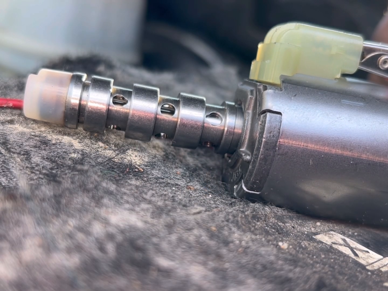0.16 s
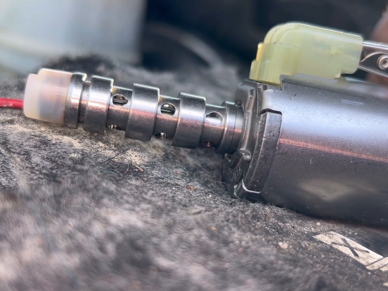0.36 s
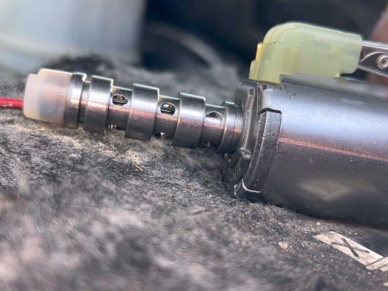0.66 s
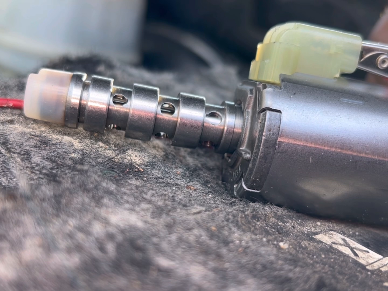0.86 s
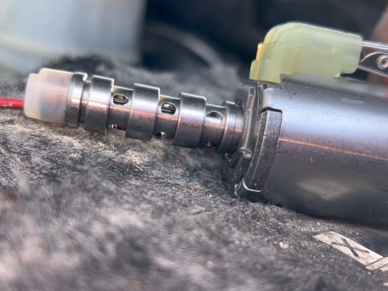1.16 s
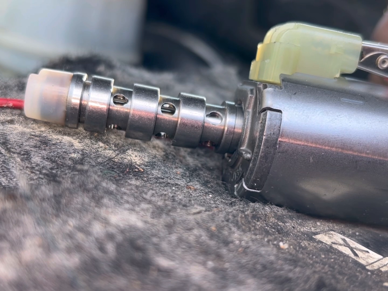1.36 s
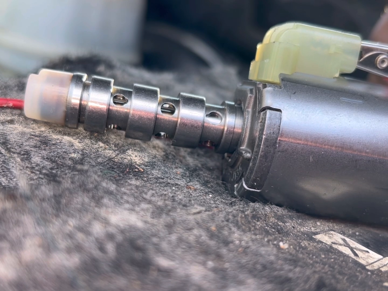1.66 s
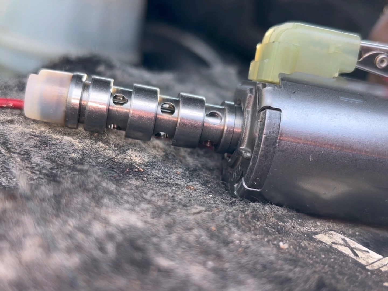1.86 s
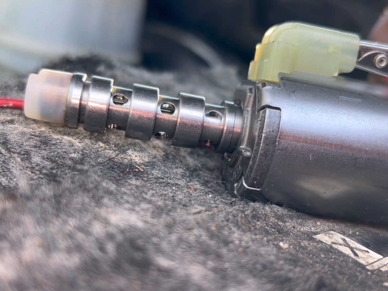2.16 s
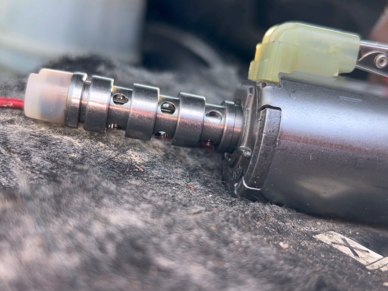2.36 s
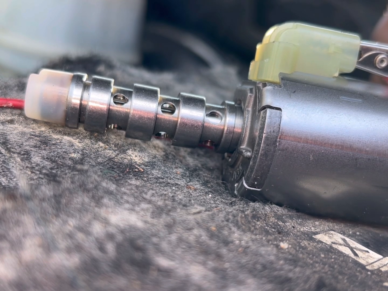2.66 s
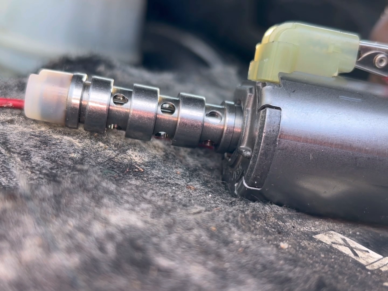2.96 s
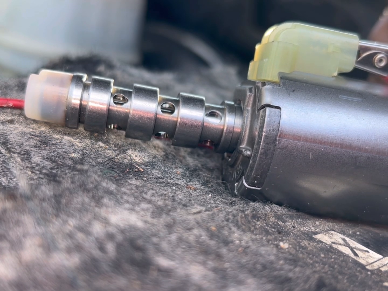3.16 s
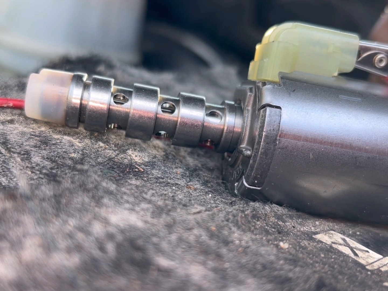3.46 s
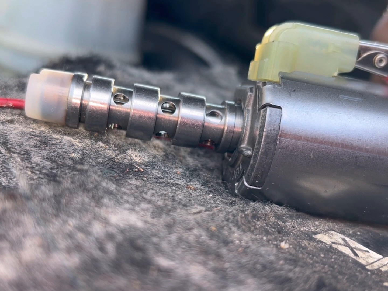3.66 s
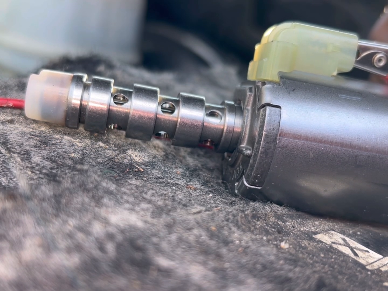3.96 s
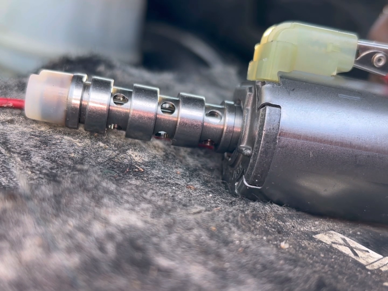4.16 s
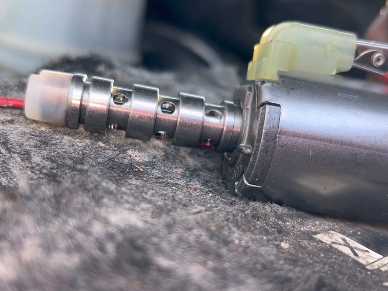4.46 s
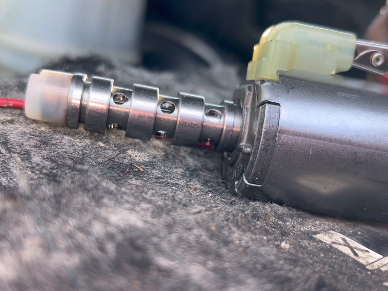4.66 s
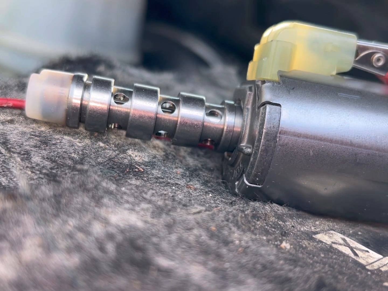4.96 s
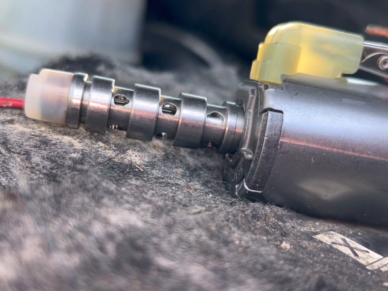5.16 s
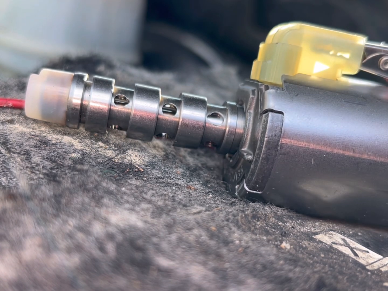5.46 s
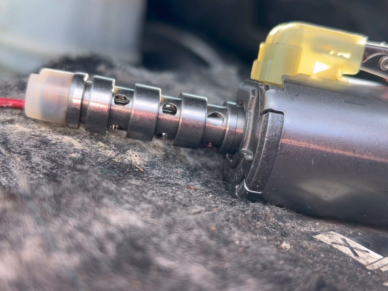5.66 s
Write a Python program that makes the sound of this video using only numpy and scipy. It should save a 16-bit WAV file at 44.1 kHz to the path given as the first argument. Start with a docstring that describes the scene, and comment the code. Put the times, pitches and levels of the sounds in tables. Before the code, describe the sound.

Close, sharp steel clicks and thumping clacks from a powered valve, unevenly spaced, with brief ringing, small wire ticks and faint low hum.

```python
"""A transmission solenoid on a cloth-covered workshop bench, tapped with power close to a phone's microphones.
Its spool scrapes in to a bright click and springs back with a squeal and a clack: shaped noise bursts.
Each stop rings paired steel modes; filtered pushes make the body thump, rock and hop on the bench.
Wire ticks, squeaks and rustles are small noise bursts; a low hum, room air and a faint hiss lie behind."""
import sys
import numpy as np
from scipy import signal
from scipy.fft import rfft, irfft
from scipy.io import wavfile
from scipy.ndimage import uniform_filter1d, minimum_filter1d

SR = 44100
rng = np.random.default_rng(int(sys.argv[2]) if len(sys.argv) > 2 else 0)


def wav_record(signal):
    """Record a signal, one row per channel, as 16-bit PCM in the file named by sys.argv[1]."""
    frames = np.transpose(np.atleast_2d(signal))
    bounded = np.clip(frames, -1, 1)
    # unit amplitude maps onto the largest positive 16-bit level
    quanta = np.round(bounded * 32767).astype(np.int16)
    wavfile.write(sys.argv[1], SR, quanta)


N = 257103  # length of the scene [samples]
SIZE = 32768  # length of one blow, and of the room's answer [samples]
T = np.arange(SIZE) / SR - 2048 / SR  # time around a blow [s]


def undb(db):
    """Decibels to amplitude gain."""
    return 10 ** (np.asarray(db) / 20)


def unit(x):
    """Scale to rms 1."""
    return x / np.sqrt(np.mean(x ** 2))


def freqs(x):
    """Frequency of each spectral bin of x [Hz], kept above zero."""
    return np.maximum(np.fft.rfftfreq(x.shape[-1], 1 / SR), 1e-3)


def filtered(x, response):
    """Apply a frequency response."""
    return irfft(rfft(x) * response, x.shape[-1])


def point_gain(x, points):
    """Gain at each bin of x, drawn through (frequency [Hz], level [dB]) points on a log frequency axis."""
    hz, db = np.transpose(points)
    return undb(np.interp(np.log(freqs(x)), np.log(hz), db))


def colour(x, points):
    """Shape the spectrum of x without shifting its phase."""
    return filtered(x, point_gain(x, points))


def struck(x, points):
    """Shape x like a struck body, which rings only after the blow (minimum phase)."""
    cepstrum = irfft(np.log(point_gain(x, points)))
    # doubling positive times and dropping negative ones leaves only a causal response
    causal = cepstrum * (1 + np.sign(np.fft.fftfreq(len(x))))
    return filtered(x, np.exp(rfft(causal)))


def resonance(x, hz, width_hz):
    """One damped resonance, gain 1 at its centre."""
    f = freqs(x)
    return filtered(x, 1 / (1 + 1j * (f ** 2 - hz ** 2) / (f * width_hz)))


def fade(t, t60):
    """Exponential decay that starts at t = 0 and falls 60 dB in t60 seconds."""
    return (t >= 0) * np.exp(-np.log(1000) * np.abs(t) / t60)


def waver(rate):
    """Slow random swell of rms 1, mostly below the given rate [Hz]."""
    return unit(colour(rng.standard_normal(N), [(rate, 0), (2 * rate, -20), (4 * rate, -80)]))


def stereo_noise(points):
    """Diffuse noise of rms 1: alike at both ports in the bass, unrelated in the treble."""
    mid, side = rng.standard_normal((2, N))
    side = colour(side, [(60, -25.5), (150, -13), (400, 1.0), (1000, 0.0), (16000, 2.5)])
    left_right = mid + side * np.array([[1], [-1]])
    return unit(colour(left_right, points))


def add(track, s, sound):
    """Mix a blow into the track at time s."""
    start = int(round((s + T[0]) * SR))
    track[start:start + SIZE] += sound[:N - start]


def chatter(envelope):
    """Countless tiny contacts under an envelope: noise of unit energy."""
    x = rng.standard_normal(SIZE) * envelope
    return x / np.sqrt(np.sum(x ** 2))


# workshop hum before levelling: (frequency [Hz], level [dB])
HUM_COLOUR = [(20, -28.5), (40, -6.5), (65, 14.5), (85, 12), (120, 10), (155, 7), (190, -15), (300, -64)]
# room air before levelling: (frequency [Hz], level [dB])
AIR_COLOUR = [(120, -15), (180, -0.5), (316, -11.5), (480, -12), (700, -18.5), (950, -20), (1650, -28.5),
              (2400, -40.5), (5700, -49), (7300, -44), (8700, -39), (9700, -48.5), (14300, -44),
              (15600, -67)]
HUM_DB, HUM_DROP_DB = -42, -8.5
HUM_DROP_AT_S, HUM_DROP_TAKES_S = 1.91, 0.04


def workshop():
    """Low wavering machine hum that drops once, a faint tone, room air and a thin high hiss."""
    t = np.arange(N) / SR
    dropped = np.clip((t - HUM_DROP_AT_S) / HUM_DROP_TAKES_S, 0, 1)
    hum = stereo_noise(HUM_COLOUR) * undb(HUM_DB + HUM_DROP_DB * dropped + 0.79 * waver(3))
    tone = undb(-73.0 + 2 * waver(6.1)) * np.sin(2 * np.pi * 506 * t)
    air = stereo_noise(AIR_COLOUR) * undb(-58 + .5 * waver(3.3))
    hiss_colour = [(8000, -38), (10100, -34), (10500, 8.0), (10850, 11), (11200, -34.5), (12500, -47)]
    hiss = stereo_noise(hiss_colour) * undb(-76)
    return hum + tone + air + hiss


# faint squeaks of the wire, close to the microphones: (time [s], level [dB])
SQUEAKS = [(.3, -79), (4.983, -71), (5.283, -76), (5.579, -76.5)]


def squeaks():
    """Brief narrow bursts where the wire rubs: noise through two equal resonances."""
    track = np.zeros(N)
    for s, db in SQUEAKS:
        rub = resonance(rng.standard_normal(SIZE), 2600, 260)
        rub = unit(resonance(rub, 2600, 260))
        add(track, s, undb(db) * rub * np.exp(-(T / 0.022) ** 2))
    return track


# scrape of the spool along its bore: (frequency [Hz], level [dB])
SLIDE_COLOUR = [(200, -4.5), (1700, 8), (3000, -3), (5500, 3), (6800, 2), (7600, 15), (8800, -39.5),
                (11000, 2.5), (14500, -13.5), (16000, -28)]


def slide(gain_db, build_t60):
    """The spool scrapes along its bore in uneven grains, louder and louder up to the stop."""
    grains = undb(5.8 * rng.standard_normal(SIZE))
    scrape = chatter(grains * fade(-T, build_t60))
    return undb(gain_db) * colour(scrape, SLIDE_COLOUR)


def crack(length_s):
    """Steel meets steel: a brief rough contact with an even spectrum and unit energy."""
    window = np.exp(-((T - length_s) / length_s) ** 2)
    x = rng.standard_normal(SIZE)
    # alternate between brief in time and even in spectrum
    for _ in range(4):
        x = irfft(np.exp(1j * np.angle(rfft(x * window))))
    return x


def click(points, gain_db, contact_s, settle_db, settle_t60, rebound_s, rebound_db, rebound_t60):
    """The spool hits its stop, chatters against it and rebounds once."""
    settle = undb(settle_db) * chatter(fade(T - contact_s, settle_t60))
    rebound = undb(rebound_db) * chatter(fade(T - rebound_s, rebound_t60))
    return undb(gain_db) * struck(crack(contact_s) + settle + rebound, points)


def ring(modes, t, split_hz=9):
    """Steel modes in close pairs that beat and fade along t; each blow shares energy among them anew."""
    out = 0
    for hz, db, t60 in modes:
        main = np.sin(2 * np.pi * (hz * t + rng.random()))
        twin = np.sin(2 * np.pi * ((hz + split_hz) * t + rng.random()))
        gain = undb(db + 0.46 * rng.standard_normal())
        out = out + gain * fade(t, t60) * (main + 0.3 * twin)
    return out


def rattle(gain_db, spread_db=7):
    """Loose parts shake: small contacts of uneven size that die away."""
    sizes = undb(spread_db * rng.standard_normal(SIZE))
    contacts = chatter(sizes * fade(T, .12))
    points = [(500, 1.5), (1500, 5), (3500, 1.5), (6000, 0.5), (8000, 5), (10000, -5.5), (15000, -8.5)]
    return undb(gain_db) * colour(contacts, points)


# spool pulls in; click and slide get a shared boost below:
# (time [s], click level [dB], slide level [dB], slide build-up t60 [s], ring level [dB])
PULLS = [(0.8904, 5.5, -25, .018, 2), (2.111, 0, -25.5, 0.015, 4), (3.129, 0.5, -28, 0.021, -1),
         (4.6846, 3, -25.5, .045, 2.5)]
# steel with the spool pulled in: (frequency [Hz], level [dB], t60 [s])
PULLED_MODES = [(1707, -62, .28), (4452, -64, .38), (5066, -60, .19), (5346, -62, .17), (6153, -57, .21),
                (6751, -57, .13), (7580, -48, .11), (11970, -68, .15)]
# the click of the pull: (frequency [Hz], level [dB])
PULL_COLOUR = [(60, -39), (300, -25), (1500, -36.5), (3000, -13), (4400, -23), (6500, -14), (7450, 4.5),
               (8600, -3.5), (9600, 9), (10800, -3.5), (11500, -9), (13600, -4.5), (14600, 10), (16300, -8)]
PULL_RATTLE_DB = -30  # against the click level in the table


def pulls():
    """The coil snaps the spool in: a light scrape, a bright click, ringing steel."""
    track = np.zeros(N)
    for s, db, slide_db, slide_t60, ring_db in PULLS:
        scrape = slide(slide_db, slide_t60)
        stop = click(PULL_COLOUR, db, contact_s=0.00011, settle_db=-8.0, settle_t60=0.017,
                     rebound_s=0.0059, rebound_db=-19.0, rebound_t60=0.0048)
        steel = undb(ring_db) * ring(PULLED_MODES, T)
        loose = rattle(db + PULL_RATTLE_DB)
        add(track, s, undb(8.0) * (scrape + stop) + steel + loose)
    return track


# the body hops and lands hard, then once more softly:
# (time of landing [s], level [dB], time to the second landing [s])
HOPS = [(2.5231, 12.5, .0588), (3.5902, 13.5, .0423), (4.8698, 7.5, .0632)]
# a pull nudges the body and lets it rock back; levels against its click in the table
NUDGE_DB, NUDGE_RECOIL_DB = -6, -3.5
NUDGE_ROCK_S, NUDGE_ROCK_DB = 0.014, -7
# the body rocks back after each thump: delay, level against the thump, level against the recoil
ROCK_S, ROCK_DB, ROCK_RECOIL_DB = .031, -10.5, -24
# levels against the first landing
LANDING_RECOIL_DB, SECOND_LANDING_DB, SECOND_RECOIL_DB = 0, -5.5, -7.5
LANDING_HZ, CLOTH_HZ = 6010, 450  # bandwidth of a hard landing and of a soft one


def bench_blows():
    """Strokes push the body and rock it back; hops land twice: (time [s], level [dB], Hz, recoil [dB])."""
    for s, db, *_ in PULLS:
        yield s, db + NUDGE_DB, CLOTH_HZ, db + NUDGE_RECOIL_DB
        yield s + NUDGE_ROCK_S, db + NUDGE_ROCK_DB, CLOTH_HZ, db + NUDGE_ROCK_DB
    for s, *_, thump_db, thump_hz, recoil_db in RELEASES:
        yield s, thump_db, thump_hz, recoil_db
        yield s + ROCK_S, thump_db + ROCK_DB, CLOTH_HZ, recoil_db + ROCK_RECOIL_DB
    for s, db, flight_s in HOPS:
        yield s, db, LANDING_HZ, db + LANDING_RECOIL_DB
        yield s + flight_s, db + SECOND_LANDING_DB, CLOTH_HZ, db + SECOND_RECOIL_DB


# short resonances of the bench under the body: (frequency [Hz], width [Hz], level [dB])
BENCH_MODES = [(257, 25, -9), (395, 26, -6), (615, 16, -9.5), (912, 60, -13.5)]
# body knocking on the bench: (frequency [Hz], level [dB])
KNOCK_COLOUR = [(25, -4.5), (80, 0), (180, 3.5), (400, -2), (600, -6), (950, -15.5), (1600, -19.5),
                (2500, -19), (4200, -25.5), (7000, -27), (16000, -26)]
# body recoiling into the cloth: (frequency [Hz], level [dB])
RECOIL_COLOUR = [(15, -22), (30, -7.5), (58, 1.5), (80, -3), (110, -6), (160, -24.5), (300, -43),
                 (600, -64.5)]


def knocks():
    """Body recoils into the cloth and hops; hard landings ring the coil can, the bench top booms on."""
    track, recoil = np.zeros(N), np.zeros(N)
    push = 1. * (np.abs(T) < .5 / SR)  # a single sample
    for s, db, contact_hz, recoil_db in bench_blows():
        # a softer contact dulls the blow
        blow = filtered(push, 1 / np.sqrt(1 + (freqs(push) / contact_hz) ** 6))
        add(track, s, undb(db) * blow)
        add(recoil, s, undb(recoil_db) * push)
    can = undb(-18.5) * resonance(track, 6304, 4.5)
    top = undb(0.5) * resonance(recoil, 50, 3)
    bench = sum(undb(db) * resonance(track, hz, width_hz) for hz, width_hz, db in BENCH_MODES)
    return colour(track, KNOCK_COLOUR) + bench + colour(recoil, RECOIL_COLOUR) + can + top


# spool springs back; click and squeal get a shared boost below:
# (time [s], click level [dB], squeal level [dB], ring level [dB], thump level on the bench [dB],
#  thump bandwidth [Hz], recoil level into the cloth [dB])
RELEASES = [(1.152, 4, -28, 5, 15, 2385, 42.5), (2.4792, -1.5, -20.5, -2, 18.5, 4400, 37),
            (3.5411, 3, -6, -1.5, 17, 6740, 34), (4.5, 3.5, -19, -0.5, -1, 1080, 17),
            (4.8263, 2.5, -25, 1.5, 11.5, 4500, 29)]
# steel with the spool at rest: (frequency [Hz], level [dB], t60 [s])
REST_MODES = [(1640, -50, .08), (5308, -62, .16), (7565, -50, .38), (7957, -43, .08), (8145, -57, .18),
              (8942, -50, .2), (9345, -52, .1)]
# steel while the spool slides back: (frequency [Hz], level [dB], build-up t60 [s])
SLIDING_MODES = [(1717, -46, .07), (3600, -47, .06), (5378, -48, .06), (6525, -32, .055)]
# the clack of the release: (frequency [Hz], level [dB])
RELEASE_COLOUR = [(200, -1.5), (1500, -20.5), (4200, -13), (5100, -18.5), (6500, -7), (7400, 2.5),
                  (8600, -2), (9600, 5.5), (10900, -13), (12000, -2.5), (13400, 1.5), (14900, 8),
                  (15500, -24), (16500, -38.5)]
# a faster return thumps and scrapes harder: slide level at a 0 dB thump, dB of slide per dB of thump
RETURN_SLIDE_DB, SLIDE_PER_THUMP = -17.5, 0.44
TRAVEL_S = 0.015  # the spool squeals only while it moves
RATTLE_DB = -37  # against the thump level in the table


def releases():
    """The spring drives the spool back: scrape and thin squeal swell to the clack, then steel rings."""
    track = np.zeros(N)
    for s, db, squeal_db, ring_db, thump_db, _, _ in RELEASES:
        scrape = slide(RETURN_SLIDE_DB + SLIDE_PER_THUMP * thump_db, build_t60=.021)
        # modes along reversed time grow up to the stop
        moving = np.exp(-(T / TRAVEL_S) ** 4)
        squeal = undb(squeal_db) * ring(SLIDING_MODES, -T) * moving
        stop = click(RELEASE_COLOUR, db, contact_s=.0003, settle_db=-11.5, settle_t60=0.01,
                     rebound_s=0.0037, rebound_db=-10.5, rebound_t60=0.0082)
        steel = undb(ring_db) * ring(REST_MODES, T)
        loose = rattle(thump_db + RATTLE_DB)
        add(track, s, undb(9.0) * (scrape + squeal + stop) + steel + loose)
    return track


# soft rustles of handling: (time [s], half length [s], level [dB])
RUSTLES = [(2.661, 0.16, -68), (5.16, 0.17, -68.5), (5.631, 0.12, -66), (5.77, 0.069, -65)]


def rustles():
    """Short uneven swells of rubbing: diffuse noise under smooth humps."""
    t = np.arange(N) / SR
    swell = sum(undb(db) * np.exp(-((t - s) / length_s) ** 2) for s, length_s, db in RUSTLES)
    rub = stereo_noise([(150, -6), (600, 2), (1800, -3), (4000, -12.0), (6000, -21.5), (15000, -28.0)])
    return rub * swell * undb(1.5 * waver(20))


# the wire ticks on its terminal, before colouring: (time [s], level [dB])
TICKS = [(4.9443, -17.5), (4.9827, -26), (4.998, -25), (5.074, -23.5)]
TICK_BOUNCE_S, TICK_BOUNCE_DB = 0.0049, -9  # delay, level against the tick


def ticks():
    """Tiny bright contacts of the wire, each with one weaker bounce."""
    track = np.zeros(N)
    for s, db in TICKS:
        for delay_s, drop_db in [(0, 0), (TICK_BOUNCE_S, TICK_BOUNCE_DB)]:
            add(track, s + delay_s, undb(db + drop_db) * chatter(fade(T, 0.011)))
    return colour(track, [(500, -6.0), (2500, -14.0), (5000, -16.5), (8000, -2.5), (12000, -1.5), (16000, -22)])


# the phone body shades and delays sound between its microphone ports:
# (frequency [Hz], left leads [rad], left minus right [dB])
PORTS = [(60, 0.2, -0.3), (250, 0.3, -1), (600, 0.37, 0.5), (1080, -0.74, 7), (2340, 0.86, 1.5),
         (3800, 0.77, 5), (5130, 1, 0), (7530, -0.7, 1), (8390, -1.5, -1), (10880, -4.5, -0.5),
         (14400, -8.5, -2.5)]


def ports(x):
    """What each microphone port picks up from a source close by."""
    hz, rad, db = np.transpose(PORTS)
    lead = np.interp(freqs(x), hz, rad)
    tilt = undb(np.interp(freqs(x), hz, db) / 2)  # half the difference to each side
    return np.array([filtered(x, tilt * np.exp(1j * lead)), filtered(x, 1 / tilt)])


# the workshop's answer: (frequency [Hz], level [dB])
ROOM_COLOUR = [(60, -14), (300, -8), (1500, 7.5), (4000, 2.5), (6000, 3.5), (7500, -1.5), (10000, -26),
               (13000, -21), (15500, -16)]


def room(x, wet_db, t60, early_db, early_t60):
    """Near surfaces answer within milliseconds, the walls leave a faint tail: decaying noise."""
    t = np.arange(SIZE) / SR
    envelope = (undb(early_db) * fade(t, early_t60) + undb(wet_db) * fade(t, t60)) * (t > .009)
    shared, own = rng.standard_normal(SIZE), rng.standard_normal((2, SIZE))
    response = colour((shared + own) / np.sqrt(2) * envelope, ROOM_COLOUR)
    return signal.fftconvolve(x[None], response, axes=1)[:, :N]


def scene():
    """The solenoid close to the ports, its faint room echo and the workshop."""
    near = squeaks() + pulls() + knocks() + releases() + ticks()
    echo = room(near, wet_db=-61.5, t60=0.33, early_db=-53.5, early_t60=0.12)
    return ports(near) + echo + rustles() + workshop()


def late_bass(x):
    """Each frequency above the deepest bass comes about one cycle late, so a thump chirps downwards."""
    return filtered(x, np.exp(-2j * np.pi * 1.15 * np.arcsinh(freqs(x) / 9)))


def limiter(x, ceiling=0.86, size=45):
    """Pull the gain of both channels down for about a millisecond around each peak."""
    gain = np.minimum(1, ceiling / np.maximum(np.abs(x).max(axis=0), 1e-9))
    return x * uniform_filter1d(minimum_filter1d(gain, size), size)


def record(dry):
    """The phone delays the bass, limits the clicks and cuts the top above 16.5 kHz."""
    low_pass = signal.ellip(10, .2, 100, 16500, fs=SR, output="sos")
    return signal.sosfilt(low_pass, limiter(late_bass(dry)))


dry = scene()
out = record(dry)
wav_record(out)
```